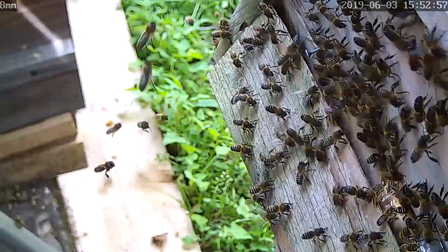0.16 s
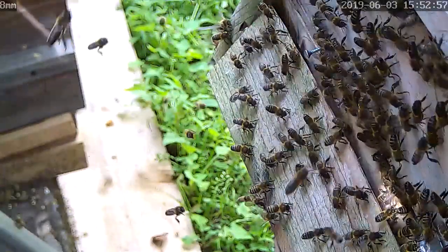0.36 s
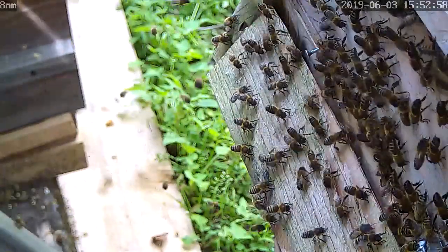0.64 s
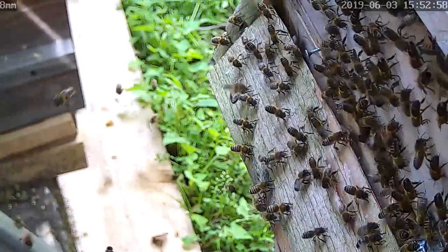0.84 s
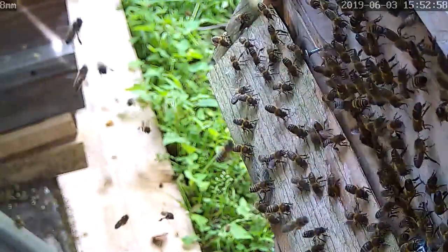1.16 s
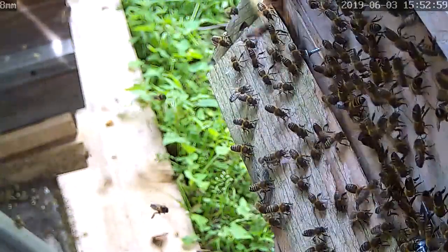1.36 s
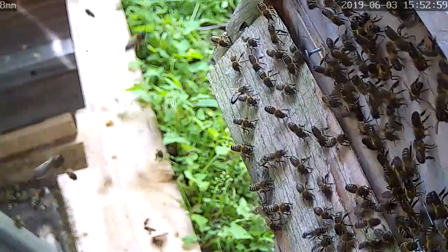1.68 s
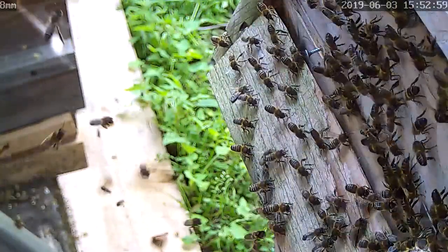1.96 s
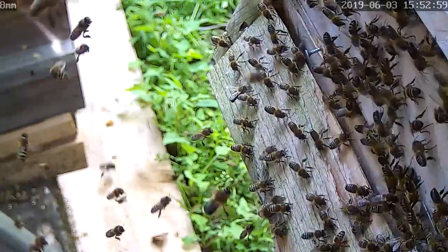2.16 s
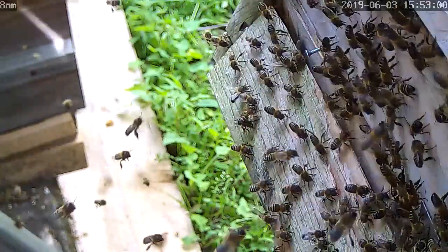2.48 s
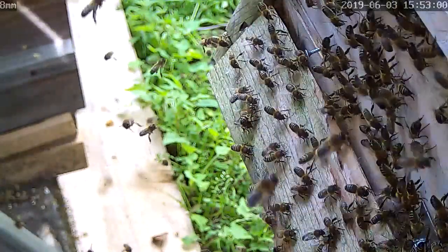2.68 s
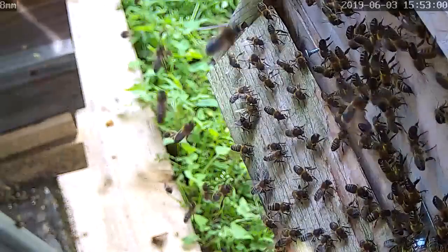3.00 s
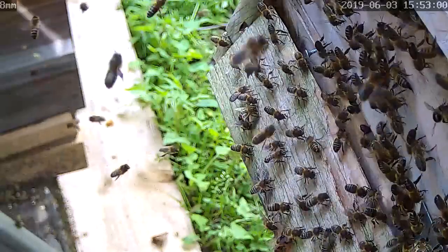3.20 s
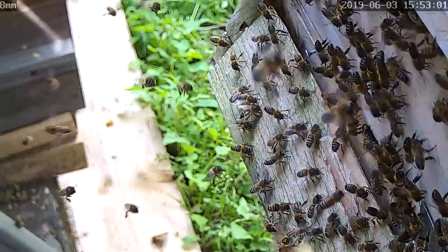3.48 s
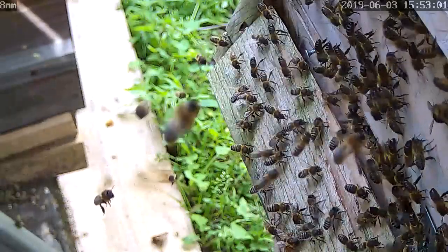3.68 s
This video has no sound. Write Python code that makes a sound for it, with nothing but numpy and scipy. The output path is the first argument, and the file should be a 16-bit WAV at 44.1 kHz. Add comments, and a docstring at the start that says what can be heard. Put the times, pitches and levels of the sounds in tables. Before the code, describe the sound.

A honey bee crowd drones warmly inside a wooden box, a few bees buzzing past close

```python
"""A crowd of honey bees hums in a wooden hive: each wing beat is a pulse, coloured by resonances of the box.
This is heard in the right microphone, inside the box. Near it a few bees fan or buzz (wing harmonics),
some brush against it (grainy noise), and there are puffs of air and a low rumble (filtered noise).
The left microphone, far quieter, hears a crowd in the open air (coloured pulses and noise)
and a few hovering bees (two harmonics each)."""
import sys
import numpy as np
from scipy import signal
from scipy.fft import rfft, irfft
from scipy.io import wavfile
from scipy.ndimage import uniform_filter1d

SR = 44100
rng = np.random.default_rng(int(sys.argv[2]) if len(sys.argv) > 2 else 0)


def int16_out(signal):
    """Quantize to a 16-bit WAV file."""
    q = np.round(np.clip(np.atleast_2d(signal).T, -1, 1) * 32767)
    wavfile.write(sys.argv[1], SR, q.astype(np.int16))


N = 169344  # length of the sound in samples


def amp(db):
    """Turns decibels into a plain multiplier."""
    return 10 ** (np.asarray(db) / 20)


def evened(x):
    """Scales a signal to an average (rms) strength of 1."""
    return x / np.sqrt(np.mean(x ** 2) + 1e-20)


def read(points, hz):
    """Reads a curve of (frequency, value) points, with straight lines over log frequency."""
    f, value = np.transpose(points)
    return np.interp(np.log(hz + 1), np.log(f + 1), value)


def coloured(x, points):
    """Filters x by a spectrum in dB."""
    hz = np.fft.rfftfreq(len(x), 1 / SR)
    return irfft(rfft(x) * amp(read(points, hz)), len(x))


def drift(t, top_hz, count):
    """Slow random curves, one row each: sums of 12 sines, with an rms of 1 over all rows."""
    shape = (12, count, 1)
    f = np.geomspace(top_hz / 10, top_hz, 12)[:, None, None] * rng.uniform(.8, 1.25, shape)
    sines = np.sin(2 * np.pi * (f * t + rng.random(shape)))
    return evened((sines / np.sqrt(f)).sum(0))  # slower sines are stronger


def hive():
    """The main hum: the wing beats of 42 bees, heard through the box."""
    level_db = -28
    bees = crowd(149.94, 221.72, rustle=0.64, count=42)
    return amp(level_db) * evened(in_box(bees))


def crowd(low_hz, high_hz, rustle, count):
    """One pulse per wing beat for each bee, pitch and nearness drifting, plus the rustle of bodies as noise."""
    wander, wander_hz = .035, 5.0  # pitch drift (rms, as a share of the pitch) and its speed
    swell_db, swell_hz = 4.5, 7.0  # level drift (rms, before balancing the bees) and its speed
    beat_jitter_s = 0.00011
    step = .002  # seconds between points of the drift curves
    t = np.arange(0, N / SR + step, step)
    centre_hz = np.linspace(low_hz, high_hz, count)[:, None]
    hz = centre_hz * (1 + wander * drift(t, wander_hz, count=count))
    turns = np.cumsum(hz, 1) * step + rng.random((count, 1))
    level = amp(swell_db * drift(t, swell_hz, count=count))
    level = level / np.sqrt(np.mean(level ** 2, 0))  # as some bees come near, others leave
    jitter = beat_jitter_s * rng.standard_normal((count, 1200))
    out = np.zeros(N + 2)
    for turn, gain, late in zip(turns, level, jitter):
        # a wing beat falls on each whole turn
        beats = np.interp(np.arange(np.ceil(turn[0]), turn[-1]), turn, t)
        at = (beats + late[:len(beats)]) * SR % N
        size = np.interp(beats, t, gain)
        # share each pulse between the two nearest samples
        np.add.at(out, at.astype(int), size * (1 - at % 1))
        np.add.at(out, at.astype(int) + 1, size * (at % 1))
    out = out[:N] - out.mean()
    return evened(out) + rustle * rng.standard_normal(N)


def in_box(x):
    """The box strengthens its own air resonances, over a mostly falling slope."""
    # air resonances of the box: (frequency [Hz], width [Hz], relative level [dB])
    resonances = [(202.8, 21, -8.5), (345.9, 55.3, 1.5), (605, 74, -12.5), (856, 69.4, -12),
                  (1199, 52, -13.5), (1284, 55, -30.5), (1420, 58, -23.5), (1654, 80, -25),
                  (1838, 190, -33.5), (2315, 74, -36.5), (2615, 78, -37.5), (3430, 450, -47.5)]
    # sound between the resonances: (frequency [Hz], relative level [dB])
    box_floor = [(60, -35.5), (125, -17), (140, -16.5), (170, -8.5), (215, -9.5), (260, -10), (440, -10),
                 (485, -18), (680, -19), (750, -21), (970, -26.5), (1130, -21), (1520, -29.5),
                 (2070, -40.5), (2250, -38.5), (3000, -48.5), (5000, -55.5), (8000, -67), (12000, -78)]
    hz = np.fft.rfftfreq(N, 1 / SR)
    power = amp(read(box_floor, hz)) ** 2
    for f, width, db in resonances:
        power = power + amp(db) ** 2 / (1 + (2 * (hz - f) / width) ** 2) ** 2
    return irfft(rfft(x) * np.sqrt(power), N)


def near_bees():
    """Fanning bees hold a low, wavering note; passing bees swell and fade within a few beats."""
    # low bees fanning near the right microphone, one list per bout:
    # (time [s], wing beat [Hz], level before the harmonic levels [dB])
    fanning = [
        [(.65, 137.2, -53), (.8, 135.3, -47.5), (1.0, 138.7, -53.5), (1.12, 138.6, -45), (1.26, 139, -49)],
        [(1.97, 146.6, -47), (2.05, 143, -40.5), (2.12, 145.2, -38), (2.21, 160.2, -36.5), (2.26, 153.8, -35),
         (2.3, 138.8, -42.5), (2.38, 140.7, -42.5), (2.46, 133, -51)],
        [(2.7, 136.4, -50), (2.77, 140.1, -41.5), (2.89, 144.2, -44.5), (3.0, 143.6, -48)],
        [(3.62, 150, -50.5), (3.7, 134.6, -44), (3.76, 127, -57)],
    ]
    # harmonics of a fanning bee: (multiple of wing beat, relative level [dB])
    fan_harmonics = [(1, 5.5), (2, 0.5), (3, -4), (4, -7.5), (5, -16), (6, -14.5)]
    # short buzzes passing the right microphone: (peak time [s], time from silence to peak [s], wing beat [Hz],
    # level of first harmonic [dB], lift of overtones [dB per harmonic], pitch flutter [rms share of pitch])
    buzzes = [(1.22, 0.02, 205.7, -26.5, 1.5, 0.06), (1.277, 0.031, 203, -30, 2, 0.09),
              (2.223, 0.027, 185, -33.5, 0.8, 0.06), (2.253, 0.024, 190, -34.5, 3.5, 0.06),
              (3.059, 0.051, 226, -25, 0, 0.01), (3.677, 0.018, 194.8, -28, -3.5, 0)]
    # harmonics of a passing bee, before the lift: (multiple of wing beat, relative level [dB])
    buzz_harmonics = [(1, 0), (2, -2.5), (3, -9.5), (4, -17.5), (5, -20), (6, -21.5), (7, -30.5)]
    fade_s, glide = 0.031, .04  # glide: each buzz rises from 4 % below its pitch to 4 % above
    t, out = np.arange(N) / SR, np.zeros(N)
    shake = evened(uniform_filter1d(rng.standard_normal(N), size=200))
    for rows in fanning:
        s, hz, db = np.transpose(rows)
        edge = np.clip(np.minimum(t - s[0], s[-1] - t) / fade_s, 0, 1)
        out += edge * wings(np.interp(t, s, hz), np.interp(t, s, db), fan_harmonics)
    for s, length, hz, db, lift_db, flutter in buzzes:
        u = np.clip((t - s) / length, -1, 1)  # -1 at the start, 0 at the peak, 1 at the end
        swell = np.cos(np.pi * u / 2) ** 2
        pitch = hz * (1 + glide * u + flutter * shake)
        lifted = [(k, d + lift_db * (k - 1)) for k, d in buzz_harmonics]
        out += swell * wings(pitch, db, lifted)
    return out


def wings(hz, level_db, harmonics):
    """A single near bee: harmonics of the wing beat, adding up to a downward pulse."""
    turn = 2 * np.pi * (np.cumsum(hz) / SR + rng.random())
    pulse = sum(amp(db) * np.cos(k * turn) for k, db in harmonics)
    return -np.sqrt(2) * amp(level_db) * pulse


def brushes():
    """Short scratches: a quick, ringing start, a brief hold, then a duller grainy fade."""
    # brushes on the microphone: (time [s], level [dB], fade time [s])
    touches = [(1.204, -45.5, .014), (2.240, -45, .017), (2.445, -60, .016), (3.086, -61, .010)]
    # colour of the scratch: (frequency [Hz], relative level [dB])
    scratch_colour = [(150, -13.5), (600, 4), (1200, 1.5), (2300, 12), (3000, 3.5), (4000, -1),
                      (4600, -13.5), (5100, -7), (6000, -16), (9000, -36)]
    # colour of the bright ring at first touch: (frequency [Hz], relative level [dB])
    ring_colour = [(1500, -39), (2900, -14.5), (3350, 6), (3800, -11), (5100, -17.5), (7000, -39.5)]
    rise_s, hold_s = .0012, 0.0032  # hold is counted from the start of the rise
    ring_db, ring_fade_s = -2.5, .005  # ring level is relative to the scratch
    crackle_db = 2.5  # rms unevenness of the grain
    t, (shape, ring) = np.arange(N) / SR, np.zeros((2, N))
    for s, db, fade in touches:
        u = np.maximum(t - s, 0)
        start = amp(db) * np.minimum(u / rise_s, 1)
        after = np.maximum(u - hold_s, 0)
        shape += start * np.exp(-after / fade)
        ring += start * np.exp(-after / ring_fade_s)
    crackle = evened(uniform_filter1d(rng.standard_normal(N), size=60))
    grain = amp(crackle_db * crackle) * rng.standard_normal(N)
    scratch = shape * evened(coloured(grain, scratch_colour))
    return scratch + amp(ring_db) * ring * evened(coloured(grain, ring_colour))


def rumble():
    """Low lumpy noise in the box, and puffs of air from wings near the microphone."""
    # colour of the rumble: (frequency [Hz], relative level [dB])
    rumble_colour = [(20, -14.5), (50, -8), (80, -0.5), (120, 6), (200, -25.5), (400, -50), (2000, -110)]
    # puffs of air: (peak time [s], level [dB], time from the peak down to 1/e [s])
    air_puffs = [(.51, -60, 0.024), (1.242, -37, 0.042), (1.307, -57, 0.033), (2.07, -45, 0.028),
                 (2.22, -48, 0.037), (2.403, -55, 0.023), (3.632, -41.5, 0.081)]
    # colour of the puffs: (frequency [Hz], relative level [dB])
    puff_colour = [(20, -11), (60, -0.5), (120, 10.5), (250, -15.5), (500, -47.5), (2000, -110)]
    level_db, gust_db = -55.5, -4  # the level drifts up to 4 dB either way
    t, s = np.arange(0, N, 64) / SR, np.arange(N) / SR
    gust = gust_db * np.tanh(np.interp(s, t, drift(t, 13.0, count=1)[0]))
    puffs = sum(amp(db) * np.exp(-((s - at) / length) ** 2) for at, db, length in air_puffs)
    low, air = rng.standard_normal((2, N))
    lumps = amp(level_db + gust) * evened(coloured(low, rumble_colour))
    return lumps + puffs * evened(coloured(air, puff_colour))


def yard():
    """The crowd outside and a few hovering bees whose second harmonic stands out."""
    # colour of the open air crowd: (frequency [Hz], relative level [dB])
    yard_colour = [(25, -30.5), (51, -12), (62, -17.5), (88, -14.5), (101, -5), (112, -7), (140, -2.5),
                   (170, -4.5), (197, 4), (215, -4.5), (255, -6.5), (275, -8.5), (430, -2.5), (550, -10),
                   (1000, -12), (2000, -23.5), (4000, -38.5), (8500, -54), (11000, -51.5)]
    # bees hovering near the left microphone: (wing beat [Hz], middle level of second harmonic [dB])
    hovers = [(218, -62), (192, -67), (225, -66)]
    crowd_db, hover_swell_db = -52, 4.0
    bees = crowd(119, 252.4, rustle=6.6, count=14)
    out = amp(crowd_db) * evened(coloured(bees, yard_colour))
    t = np.arange(0, N, 64) / SR
    for hz, db in hovers:
        pitch, near = [np.interp(np.arange(N) / SR, t, c) for c in drift(t, 2.1, count=2)]
        turn = 2 * np.pi * np.cumsum(hz * (1 + .008 * pitch)) / SR
        tone = amp(-8.5) * np.sin(turn) + np.sin(2 * turn)
        out += amp(db + hover_swell_db * near) * tone
    return out


def scene():
    """Left: the open air. Right: everything in the box."""
    right = hive() + near_bees() + brushes() + rumble()
    return np.array([yard(), right])


def record(dry):
    """Band limit of the recorder: a steep filter takes away the treble above its edge."""
    edge_hz = 11990
    low_pass = signal.firwin(1023, edge_hz, window=("kaiser", 9), fs=SR)
    return signal.oaconvolve(dry, low_pass[None], "same")


dry = scene()
out = record(dry)
int16_out(out)
```